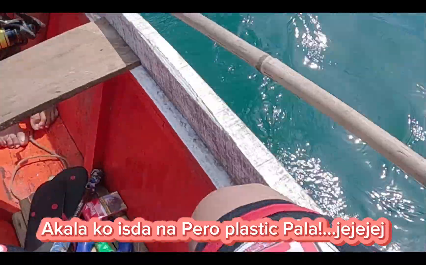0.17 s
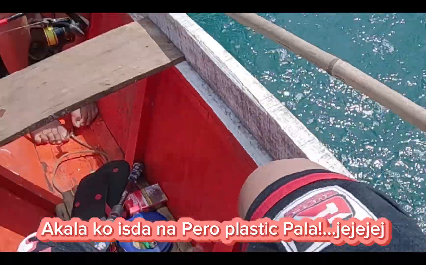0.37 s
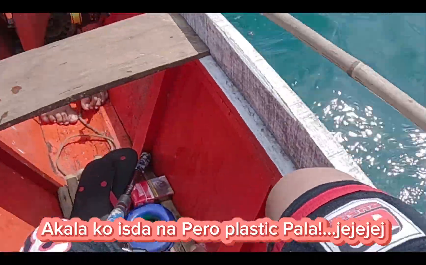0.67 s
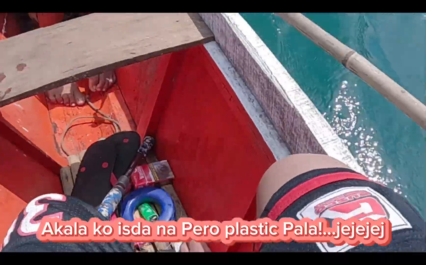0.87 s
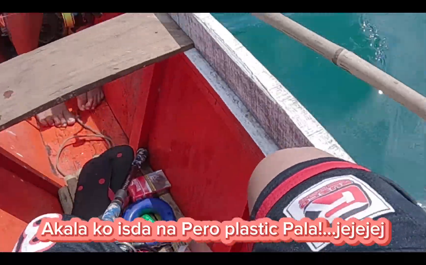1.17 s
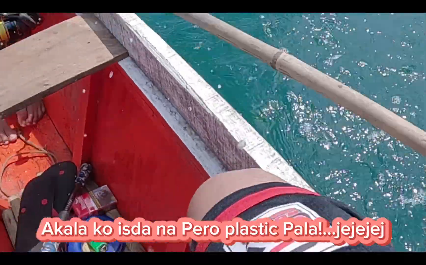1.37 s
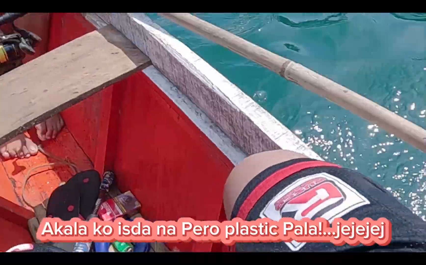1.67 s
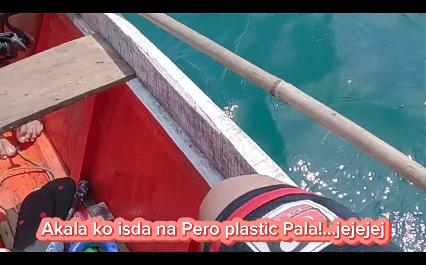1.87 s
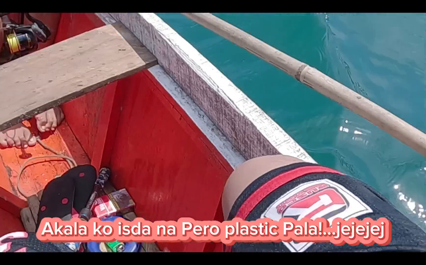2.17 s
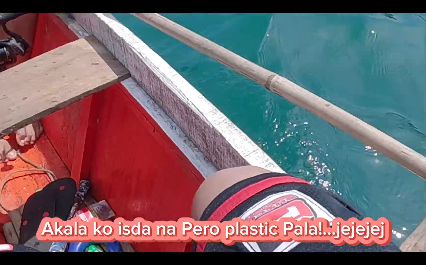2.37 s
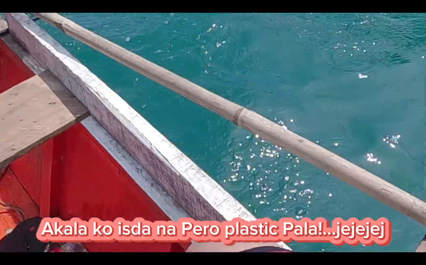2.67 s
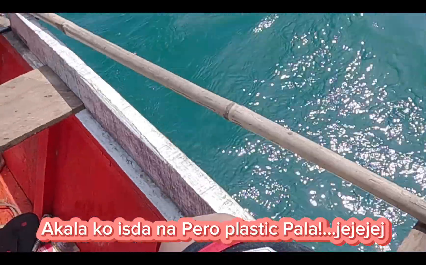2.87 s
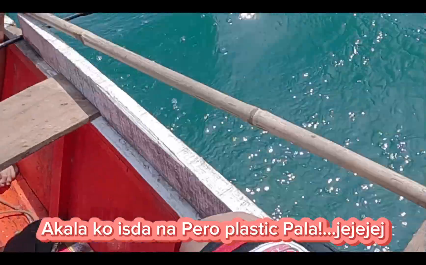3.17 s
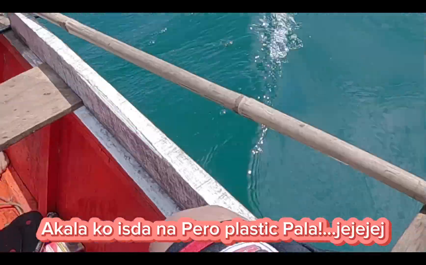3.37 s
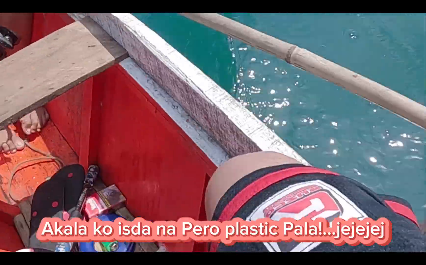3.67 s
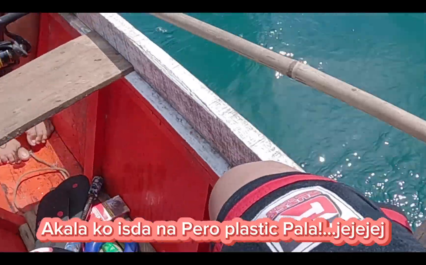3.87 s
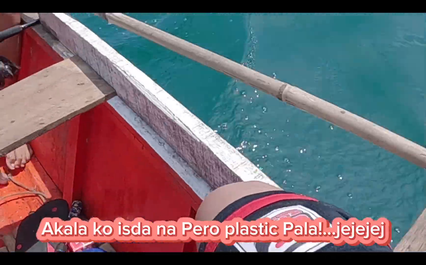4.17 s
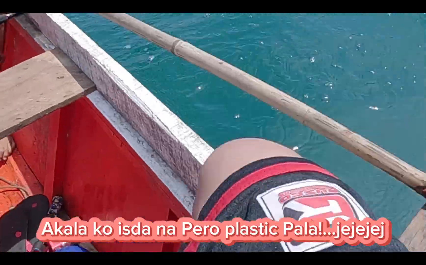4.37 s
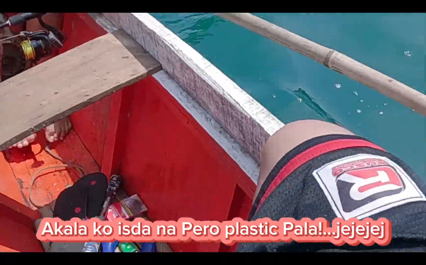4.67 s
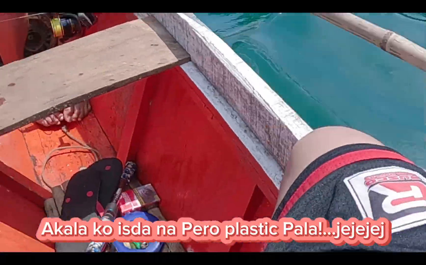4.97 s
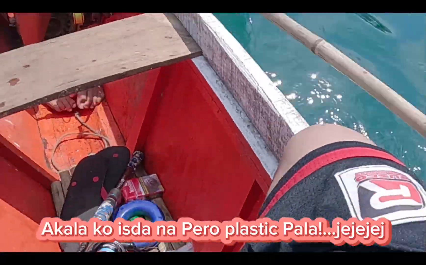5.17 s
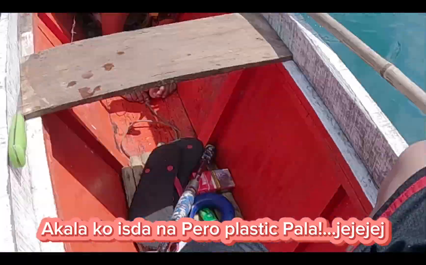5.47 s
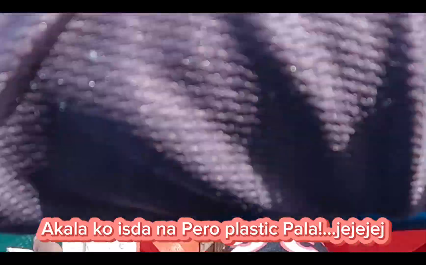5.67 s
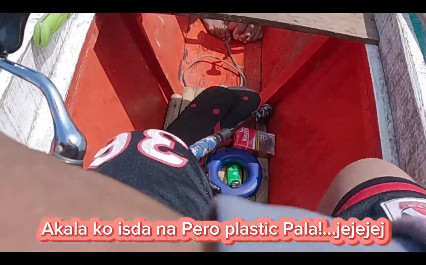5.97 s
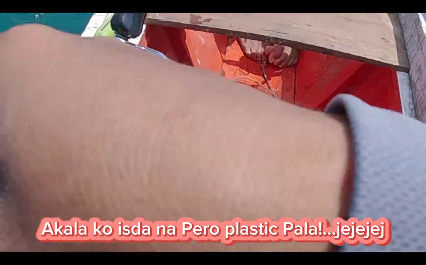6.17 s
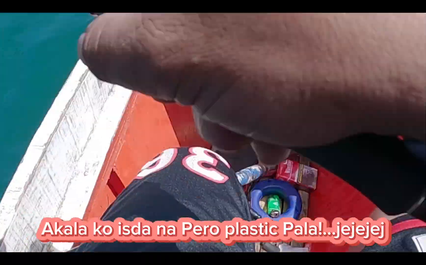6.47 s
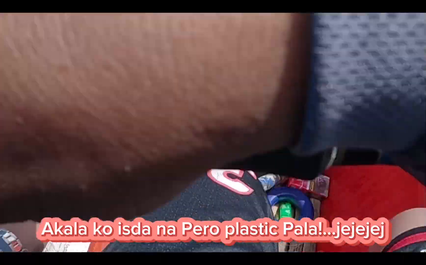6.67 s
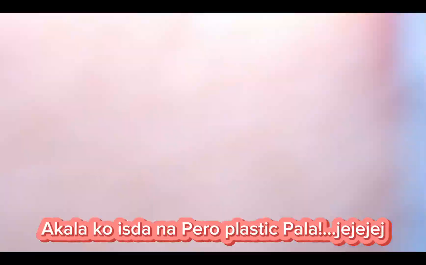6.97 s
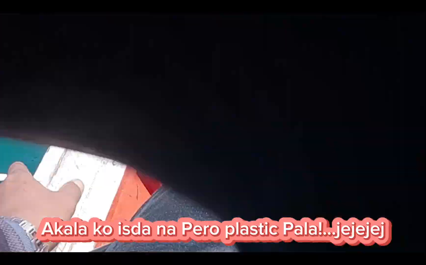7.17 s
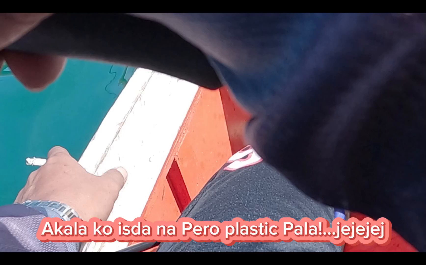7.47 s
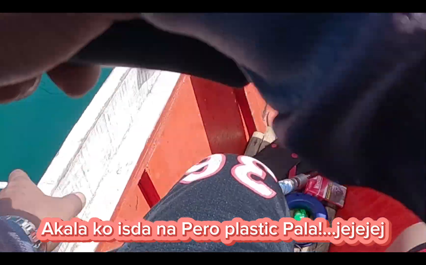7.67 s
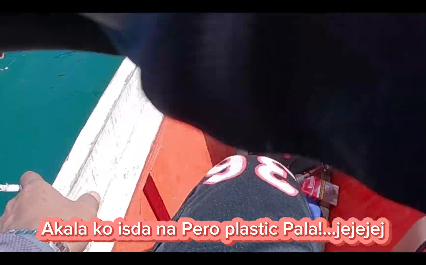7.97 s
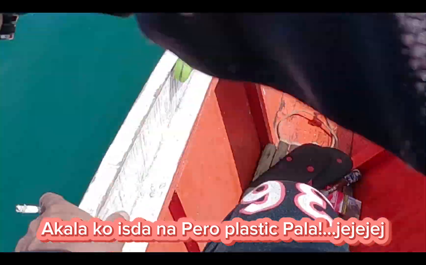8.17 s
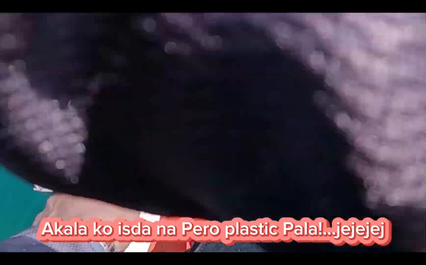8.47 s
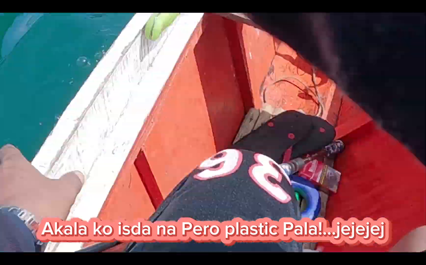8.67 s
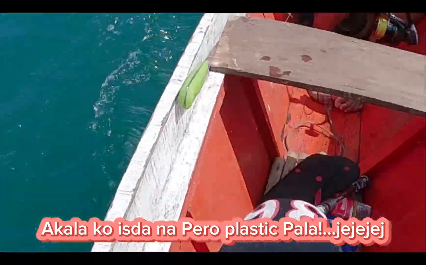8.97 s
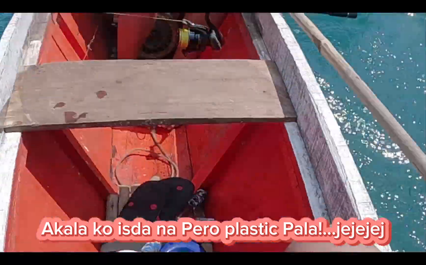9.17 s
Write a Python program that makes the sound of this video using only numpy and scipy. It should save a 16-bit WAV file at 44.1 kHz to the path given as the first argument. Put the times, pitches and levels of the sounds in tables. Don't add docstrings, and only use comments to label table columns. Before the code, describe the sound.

Close handheld microphone aboard a small motorboat: constant raspy exhaust buzz with metallic casing hiss and little bass. Faint watery blips sit beneath it. Tiny squeaks come early, a sharp squeal follows, then another cluster of squeaks around midway. Soft cloth knocks grow stronger as the tone becomes slightly muffled and rough, until a sudden rev lifts the drone higher and steadies it.

```python
import sys
import numpy as np
from scipy import signal
from scipy.fft import rfft, irfft
from scipy.io import wavfile
from scipy.ndimage import uniform_filter1d

SR = 44100
rng = np.random.default_rng(int(sys.argv[2]) if len(sys.argv) > 2 else 0)


def to_linear_factor(level_db):
    exponent = np.asarray(level_db, float) / 20
    return 10 ** exponent


def wav_out(sig):
    wavfile.write(sys.argv[1], SR, np.round(np.clip(np.atleast_2d(sig).T, -1, 1) * 32767).astype(np.int16))


N = 410571

# start_s, level_db
BRUSH_LEVEL = [
    (0, -51.5),
    (2.0, -53.5),
    (3.2, -54.5),
    (4.4, -53.5),
    (5.5, -58),
    (5.7, -45),
    (8.4, -47.5),
    (8.9, -49.5),
    (9.05, -56),
    (9.31, -54),
]
# freq_hz, density_db_per_hz
BRUSH_COLOUR = [(20, -10), (60, -3.5), (130, -1.5), (250, 7.5), (450, 10), (700, 5), (1200, 9.5),
                (3000, -23)]
# start_s, peak_db
STROKES = [(0.846, -54), (1.439, -31), (2.182, -28), (2.594, -33), (3.041, -39), (3.167, -37), (3.983, -50),
           (4.864, -37), (5.024, -27), (5.16, -41), (5.596, -36), (5.726, -35), (5.819, -24), (5.932, -41),
           (6.214, -26.5), (6.369, -47), (6.637, -30), (6.868, -31), (7.094, -44), (7.199, -48),
           (7.439, -50), (7.549, -26), (7.61, -33), (7.794, -24), (7.969, -32), (8.129, -29), (8.29, -37),
           (8.542, -53), (8.676, -55), (8.914, -28)]
STROKE_RISE_S, STROKE_DB, UNREST_DB = 0.01, -11, 1

# start_s, pitch_hz, level_db
BUBBLES = [(.35, 484, -33), (.415, 537, -22.5), (.67, 282, -43), (.93, 520, -28), (1.005, 264, -33),
           (1.32, 304, -31), (1.45, 300, -39), (2.67, 283, -33), (3.42, 254, -34), (3.52, 273, -44),
           (3.985, 264, -33), (4.09, 296, -30), (4.54, 276, -32), (4.64, 277, -34), (4.872, 303, -30),
           (5.23, 510, -28), (5.82, 397, -27), (6.59, 577, -23), (6.985, 480, -26), (7.11, 470, -29)]

# start_s, length_s, pitch_hz, glide_hz, level_db
SQUEAKS = [(.642, .015, 1450, 150, -29), (.677, .007, 1480, 20, -34), (.693, .007, 2200, -10, -31),
           (.704, .017, 1880, -10, -33), (.732, .012, 1890, 30, -26), (4.678, .016, 1900, -100, -32),
           (4.699, .010, 1690, -70, -28), (4.715, .008, 2000, 180, -28), (4.726, .018, 2080, -100, -25),
           (4.760, .010, 2060, -30, -29), (4.775, .009, 2150, -130, -26), (4.786, .020, 1960, -100, -31),
           (4.836, .016, 1200, -80, -36), (4.893, .010, 1830, 370, -30), (4.903, .008, 2200, -100, -31),
           (4.913, .037, 1950, 50, -27), (4.958, .020, 2100, -190, -29)]
# start_s, length_s, pitch_hz, glide_hz, level_db
THIN_SQUEAKS = [
    (.746, .006, 1860, -140, -35),
    (4.686, .009, 1900, -150, -33),
    (7.712, .036, 1000, 100, -44),
    (7.776, .019, 1010, -110, -42),
]
# time_s, pitch_hz, level_db
SQUEAL = [
    (1.858, 1200, -36),
    (1.872, 1390, -29),
    (1.885, 1370, -28),
    (1.905, 1520, -21),
    (1.916, 1720, -23),
    (1.925, 1630, -24),
    (1.945, 1650, -29),
    (1.99, 1750, -33),
    (1.998, 1300, -33),
]
SQUEAK_BRIGHT_HZ, THIN_BRIGHT_HZ, SQUEAL_BRIGHT_HZ = 4150, 6900, 3700
RASP_DB = -15

# time_s, firing_rate_hz
PACE = [(0.0, 127.98), (0.65, 127.28), (1.6, 134.14), (1.78, 122.06), (2.2, 129.18), (2.9, 128.43),
        (3.18, 135.64), (3.55, 129.59), (3.72, 126.19), (4.6, 122.97), (5.46, 131.87), (5.56, 127.11),
        (6.3, 121.14), (7.4, 120.25), (8.34, 117.61), (8.5, 165.99), (8.8, 170.64), (9.31, 165.66)]
# time_s, rate_change_hz
PROPELLER_SLIPS = [(0.13, 6.2), (0.35, 7.8), (0.89, 8.3), (1.16, -5.7), (1.3, 2.6), (1.61, 7.3),
                   (2.32, -9.5), (2.76, -2.9), (3.05, 3.1), (3.34, -3.3), (3.54, 8.7), (4.2, 2.3),
                   (4.72, 5.9), (5.03, -5.0), (5.41, 5.2), (5.48, 3.4), (5.69, 8.4), (5.93, 3.6),
                   (6.25, -4.4), (6.52, -2.5), (6.77, -3.2), (7.13, 2.4), (7.32, 8.9), (7.42, 3.9),
                   (7.96, 2.3), (8.43, 9.3), (8.61, -5.8), (8.79, 3.2), (8.95, -5.2), (9.06, 7.5)]
# time_s, firing_db
EFFORT = [(0.0, -1.95), (1.7, -2), (1.88, -2), (2.1, -2), (2.2, -2), (3.65, -2.5), (4.6, -2), (6.4, -1.55),
          (8.06, -1.5), (8.76, -1), (8.95, -3), (9.05, -2), (9.31, -2)]
MISFIRES_S = [1.03, 2.051, 2.884, 2.901, 2.994, 5.662, 6.093, 6.859, 6.876, 6.894, 7.037, 7.279, 7.295,
              7.484, 7.593, 7.602, 7.808, 7.985, 8.121, 8.138, 8.165, 8.253, 8.323, 8.381, 8.451]
# time_s, roughness_0_1
ROUGHNESS = [
    (0, .33),
    (3.6, .33),
    (4.1, .25),
    (5.5, .3),
    (6.0, .4),
    (7.3, .45),
    (7.5, .7),
    (8.36, .7),
    (8.46, .15),
    (9.31, .15),
]
FIRST_TURN = -.396
SLIP_S = .027
SAG_HZ, SAG_S = 7, .03
THROTTLE_HZ = (139, 158)

# freq_hz, level_db, t60_s, polarity
PIPE_CRUISE = [(287, -36, 0.019, -1), (510, -26, 0.03, 1), (715, -31, 0.034, -1), (1060, -5, 0.0044, -1),
               (1345, -7.5, 0.016, 1), (1805.7, -16.5, 0.031, 1), (1774, -8, 0.012, 1),
               (1869, -1, 0.0049, -1), (2082, -9, 0.0073, 1), (2490, -30, 0.024, -1),
               (3630, -17, 0.0074, 1)]
# freq_hz, level_db, t60_s, polarity
PIPE_OPEN = [(340, -38, 0.021, 1), (652, -23, 0.012, 1), (765, -15, 0.014, -1), (1357, -5.5, 0.019, 1),
             (1843, -2.5, 0.023, 1), (1910, 4, 0.0061, -1), (2100, -8.5, 0.0081, 1), (2950, -44, 0.01, 1),
             (3487, 3.5, 0.0047, -1), (3492, 5, 0.0034, 1)]
# opening_lag_s, softness_hz, rebound_lag_s, rebound_gain
PORT_CRUISE, PORT_OPEN = (.00045, 6570, .000219, -0.4433), (0.00043, 7600, 0.00185, 0.27)

# freq_hz, width_hz, level_db
PIPE_ROAR = [(520, 294, -4.5), (852, 110, 0.5), (1380, 203, 2.5), (1810, 266, -1), (2230, 370, -3.5),
             (2996, 450, -6)]
ROAR_DB = -34.5
# freq_hz, width_hz, level_db
CASING = [(3350, 670, -3.5), (4360, 730, -3), (5140, 350, 0), (5710, 350, -3), (6280, 410, -6),
          (7360, 620, -6.5), (8780, 790, -7), (9470, 720, -4), (10400, 870, -7), (11500, 1450, -12),
          (12850, 1060, -15), (16600, 1250, -10.5)]
HISS_DB, HISS_OPEN_DB, HISS_WANDER_DB = -41.5, 1, 0.55
HISS_FOLLOWS = 1
TILT_DB, TILT_OPEN_DB, TILT_WANDER_DB = -1.34, 0.5, 0.26
KNOCK_SHARE, KNOCK_S = .33, .03

# time_s, share_0_1
SHADE = [
    (0, 0),
    (5.6, 0),
    (6.1, 1),
    (8.35, 1),
    (8.5, 0),
    (9.31, 0),
]
# freq_hz, width_hz, gain_change
SHADE_COLOUR = [(1330, 200, -.35), (1710, 180, .45), (2250, 400, -.2)]


def rms_one(x):
    return x / np.sqrt(np.mean(x ** 2) + 1e-20)


def in_time(rows):
    s, *columns = np.transpose(rows)
    return [np.interp(np.arange(N) / SR, s, c) for c in columns]


def drift(rate_hz):
    r = np.exp(-64 * np.pi * rate_hz / SR)
    noise = rng.standard_normal(N // 32 + 2002)
    slow = signal.lfilter([1], [1, -2 * r, r * r], noise)[2000:]
    return np.interp(np.arange(N) / 32, np.arange(len(slow)), rms_one(slow))


def clicks_at(seconds, heights):
    at, out = seconds * SR, np.zeros(N + SR)
    whole = at.astype(int)
    np.add.at(out, whole, heights * (1 - at + whole))
    np.add.at(out, whole + 1, heights * (at - whole))
    return out[:N]


def ring(clicks, hz, t60_s):
    r, w = to_linear_factor(-60 / (t60_s * SR)), 2 * np.pi * hz / SR
    return signal.lfilter([0, np.sin(w)], [1, -2 * r * np.cos(w), r * r], clicks + 1e-18)


def swell(seconds, heights, rise_s):
    r = np.exp(-1 / (rise_s * SR))
    return signal.lfilter([0, np.e * (1 - r)], [1, -2 * r, r * r], clicks_at(seconds, heights) + 1e-18)


def resonances(x, peaks, patchy_db, tilt_db=0):
    out = 0
    for k, (hz, width_hz, db) in enumerate(peaks):
        r = np.exp(-np.pi * width_hz / SR)
        top = (-1) ** k * to_linear_factor(db) * (1 - r * r) / 2
        flicker_db = patchy_db * (drift(9.4) + 0.46 * drift(22))
        gain = to_linear_factor(flicker_db + tilt_db * np.log2(hz / 6000))
        poles = [1, -2 * r * np.cos(2 * np.pi * hz / SR), r * r]
        out = out + gain * signal.lfilter([top, 0, -top], poles, x)
    return rms_one(out)


def brushing():
    hz, db = np.transpose(BRUSH_COLOUR)
    lumps = to_linear_factor(3.7 * drift(21.7)) * rng.standard_normal(N)
    bin_hz = np.arange(N // 2 + 1) * SR / N
    colour = to_linear_factor(np.interp(np.log(bin_hz + 1), np.log(hz), db))
    contact = to_linear_factor(in_time(BRUSH_LEVEL)[0] + UNREST_DB * drift(5.7))
    seconds, peak_db = np.transpose(STROKES)
    strokes = swell(seconds, to_linear_factor(peak_db + STROKE_DB), STROKE_RISE_S)
    return to_linear_factor(10.5) * (contact + strokes) * rms_one(irfft(rfft(lumps) * colour, N))


def gurgles(small_count=90):
    luck = rng.random((small_count, 3))
    small = np.c_[luck[:, 0] * N / SR, 230 * 3.2 ** luck[:, 1], -44 + 9 * luck[:, 2]]
    out, age_s = np.zeros(N + SR), np.arange(SR // 10) / SR
    for s, hz, db in [*BUBBLES, *small]:
        cycles = hz * age_s
        tone = np.sin(2 * np.pi * (cycles + 0.0293 * cycles ** 2))
        envelope = cycles * np.exp(-cycles / 1.75) / 3.4
        out[round(s * SR):][:len(age_s)] += to_linear_factor(db + 15) * envelope * tone
    return out[:N]


def squeaks():
    pitch_hz, level, bright_hz = np.full(N, 1500.), np.zeros(N), np.full(N, 4000.)
    squeal = [(s, end - s, hz, to_hz - hz, db)
              for (s, hz, db), (end, to_hz, _) in zip(SQUEAL, SQUEAL[1:])]
    groups = ((SQUEAKS, SQUEAK_BRIGHT_HZ), (THIN_SQUEAKS, THIN_BRIGHT_HZ), (squeal, SQUEAL_BRIGHT_HZ))
    for rows, region_hz in groups:
        for start, length, hz, glide, db in rows:
            span = slice(round(start * SR), round((start + length) * SR))
            pitch_hz[span] = np.linspace(hz, hz + glide, span.stop - span.start)
            level[span] = to_linear_factor(db + 5.5)
            bright_hz[span] = region_hz
    pitch_hz = uniform_filter1d(pitch_hz, size=66) * (1 + .015 * drift(90))
    level = uniform_filter1d(level, size=110) * to_linear_factor(2.5 * drift(100))
    bright_hz = uniform_filter1d(bright_hz, size=40)
    phase = 2 * np.pi * np.cumsum(pitch_hz) / SR
    tone = sum(to_linear_factor(-28 * np.abs(np.log2(k * pitch_hz / bright_hz))) * np.sin(k * phase) for k in range(1, 9))
    rasp_band = signal.butter(2, [3000, 11000], "band", fs=SR, output="sos")
    rasp = signal.sosfilt(rasp_band, rng.standard_normal(N))
    return level * (tone + to_linear_factor(RASP_DB) * rasp)


def gas_flow(seconds, strength, decay_s, steady):
    r = np.exp(-1 / (decay_s * SR))
    return steady + signal.lfilter([1], [1, -r], clicks_at(seconds, strength))


def shaft_speed():
    now_s = np.arange(0, N + 64, 64) / SR
    slips = sum(change * np.exp(-.5 * ((now_s - s) / SLIP_S) ** 2) for s, change in PROPELLER_SLIPS)
    sags = gas_flow(np.array(MISFIRES_S), SAG_HZ, SAG_S, steady=0)
    return in_time(PACE)[0] + np.interp(np.arange(N) / SR, now_s, slips) - sags


def shaft_turns(speed_hz):
    hunting = signal.butter(2, [5, 14], "band", fs=SR, output="sos")
    depth = .014 + .016 * in_time(ROUGHNESS)[0]
    flutter = depth * rms_one(signal.sosfilt(hunting, rng.standard_normal(N)))
    return FIRST_TURN + np.cumsum(speed_hz) / SR + flutter


def firings(turns, jitter, spread_db, misfire_db):
    whole = np.arange(np.ceil(turns[0]), turns[-1])
    luck = rng.standard_normal((len(whole), 2))
    rough = np.interp(whole, turns, in_time(ROUGHNESS)[0])
    seconds = np.interp(whole + jitter * rough ** 2 * luck[:, 0], turns, np.arange(N) / SR)
    level_db = spread_db * rough * luck[:, 1]
    failed = np.abs(seconds[:, None] - MISFIRES_S).argmin(axis=0)
    level_db[failed + 1] = 0
    level_db[failed] = misfire_db
    return seconds, to_linear_factor(level_db)


def exhaust(seconds, strength, modes, port, uneven_db):
    lag_s, soft_hz, rebound_s, rebound = port
    noise = rng.standard_normal((len(seconds), len(modes)))
    luck = signal.lfilter([.3], [1, -.95], noise, axis=0)
    out = 0
    for (hz, db, t60_s, polarity), chance in zip(modes, luck.T):
        blow = strength * np.sign(polarity) * to_linear_factor(db + uneven_db * chance)
        opening = clicks_at(seconds + lag_s, blow)
        echo = clicks_at(seconds + lag_s + rebound_s, rebound * blow)
        out = out + ring(opening + echo, hz, t60_s)
    r = np.exp(-2 * np.pi * soft_hz / SR)
    return signal.lfilter([(1 - r) ** 2], [1, -2 * r, r * r], out)


def exhaust_pulses(seconds, strength, speed_hz):
    opened = np.interp(speed_hz[(seconds * SR).astype(int)], THROTTLE_HZ, (0, 1))
    pulses = exhaust(seconds, strength * (1 - opened), PIPE_CRUISE, PORT_CRUISE, uneven_db=.9)
    pulses = pulses + exhaust(seconds, strength * opened, PIPE_OPEN, PORT_OPEN, uneven_db=.25)
    return signal.sosfilt(signal.butter(6, 225, "high", fs=SR, output="sos"), pulses)


def pipe_roar(seconds, strength):
    surge = gas_flow(seconds, strength, decay_s=0.027, steady=1.0)
    roar = resonances(surge * rng.standard_normal(N), PIPE_ROAR, patchy_db=3.0)
    return to_linear_factor(ROAR_DB + 9.2 * in_time(ROUGHNESS)[0]) * roar


def knocks(seconds, strength):
    age_s = np.arange(SR // 120) / SR
    pattern = rng.standard_normal(len(age_s)) * np.exp(-age_s / KNOCK_S)
    return rms_one(signal.fftconvolve(clicks_at(seconds, strength), pattern)[:N])


def casing_hiss(seconds, strength, speed_hz, firing_db):
    open_db = np.interp(speed_hz, THROTTLE_HZ, (0, HISS_OPEN_DB))
    hiss_db = HISS_DB + HISS_FOLLOWS * firing_db + open_db + HISS_WANDER_DB * drift(8.4)
    tilt_db = TILT_DB + np.interp(speed_hz, THROTTLE_HZ, (0, TILT_OPEN_DB)) + TILT_WANDER_DB * drift(3)
    ticks = sum(gas_flow(seconds + lag_s, strength, decay_s=0.00035, steady=0.28) for lag_s in (.0006, .0031))
    loose = rms_one(ticks * rng.standard_normal(N))
    rattle = np.sqrt(1 - KNOCK_SHARE) * loose + np.sqrt(KNOCK_SHARE) * knocks(seconds, strength)
    return to_linear_factor(hiss_db + 8.0) * resonances(rattle, CASING, patchy_db=1.07, tilt_db=tilt_db)


def engine():
    firing_db, speed_hz = in_time(EFFORT)[0], shaft_speed()
    turns = shaft_turns(speed_hz)
    seconds, strength = firings(turns, jitter=.012, spread_db=1.5, misfire_db=-5.5)
    pulses = to_linear_factor(firing_db) * exhaust_pulses(seconds, strength, speed_hz)
    roar = pipe_roar(seconds, strength)
    return pulses + roar + casing_hiss(seconds, strength, speed_hz, firing_db)


def shaded(x):
    out, share = x, in_time(SHADE)[0]
    for hz, width_hz, change in SHADE_COLOUR:
        band = signal.lfilter(*signal.iirpeak(hz, hz / width_hz, SR), x)
        out = out + change * share * band
    return out


def scene():
    return (shaded(engine()) + squeaks() + gurgles() + brushing())[None]


def low_pass(x):
    return signal.sosfilt(signal.butter(12, 16940, fs=SR, output="sos"), x)


def record(dry):
    rounded = 0.99 * np.tanh(dry / 0.81)
    top_cut = signal.ellip(12, .3, 70, 15740, fs=SR, output="sos")
    mix = signal.sosfilt(top_cut, rounded)
    return low_pass(mix)


dry = scene()
out = record(dry)
wav_out(out)
```